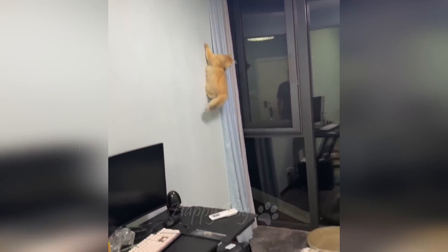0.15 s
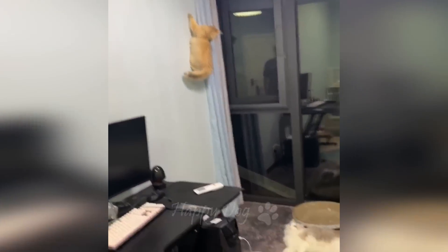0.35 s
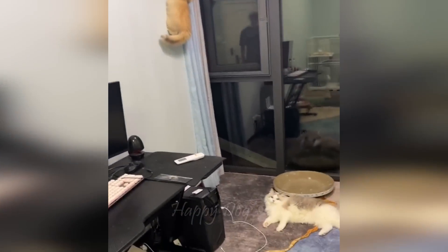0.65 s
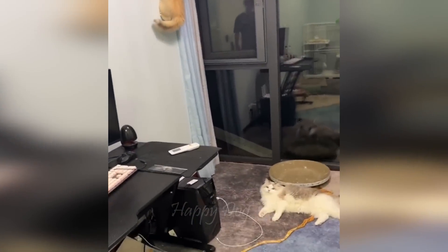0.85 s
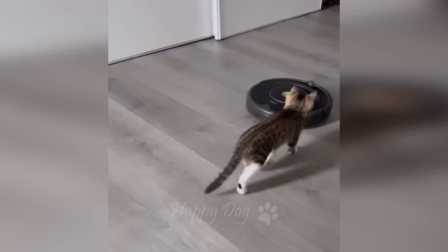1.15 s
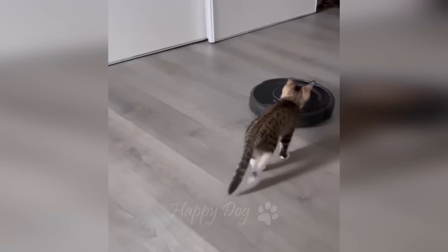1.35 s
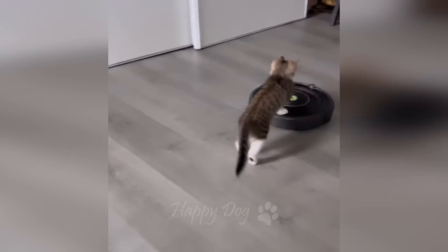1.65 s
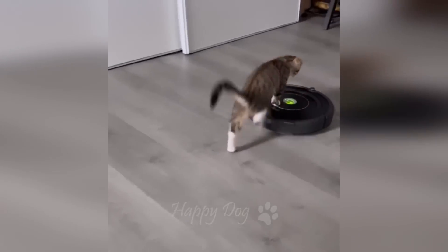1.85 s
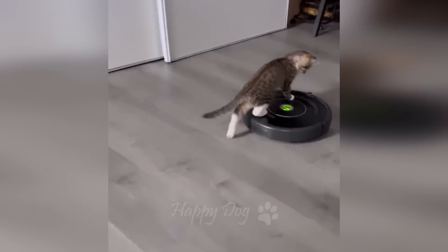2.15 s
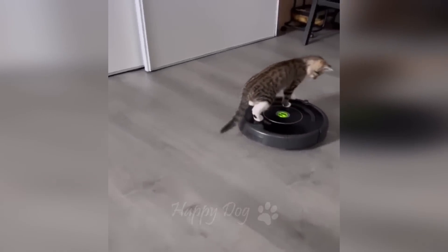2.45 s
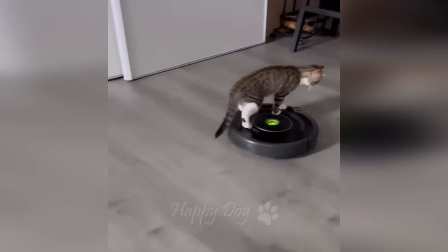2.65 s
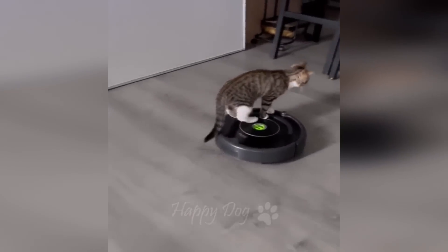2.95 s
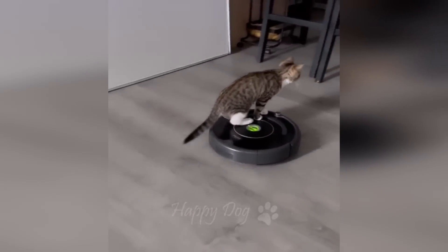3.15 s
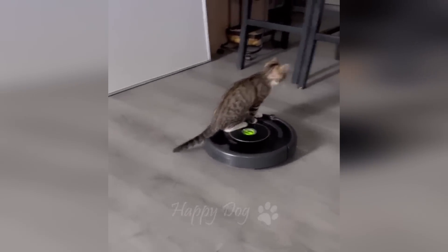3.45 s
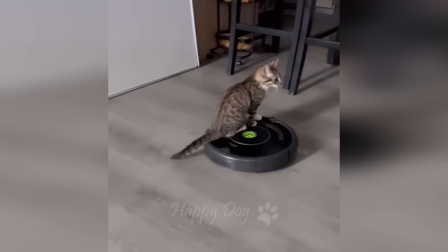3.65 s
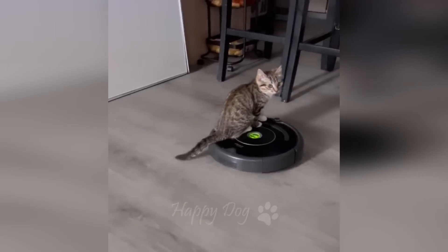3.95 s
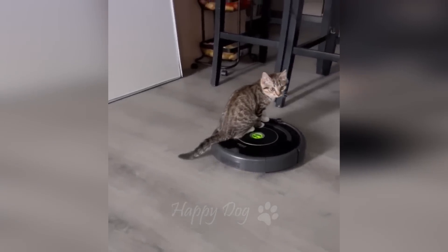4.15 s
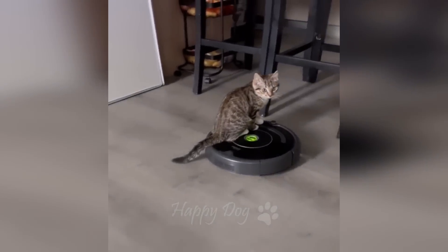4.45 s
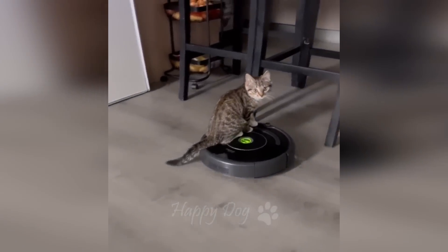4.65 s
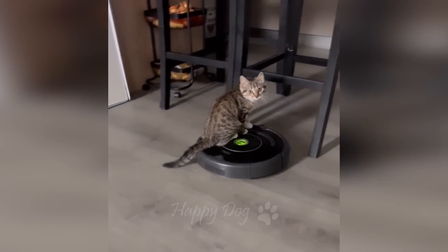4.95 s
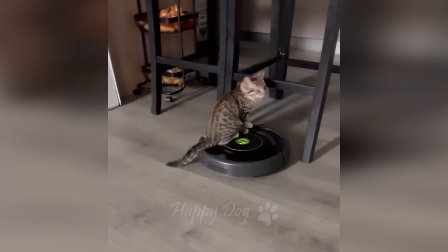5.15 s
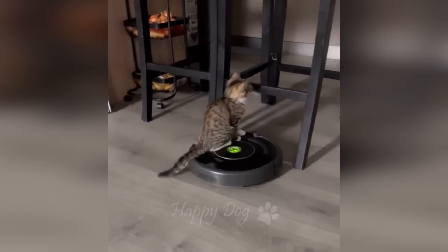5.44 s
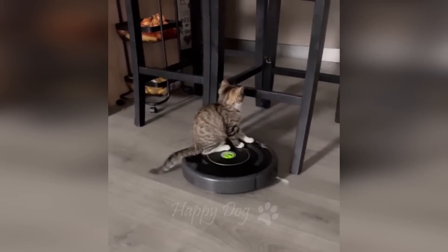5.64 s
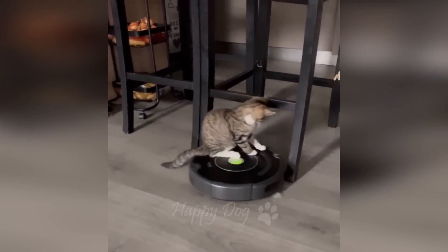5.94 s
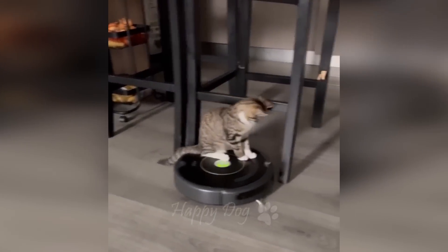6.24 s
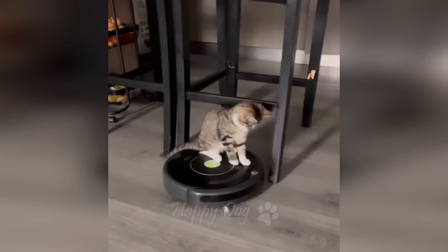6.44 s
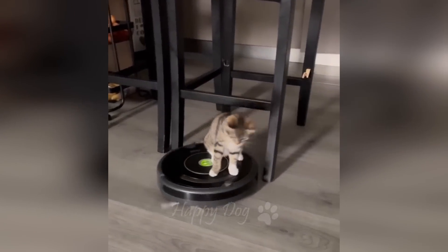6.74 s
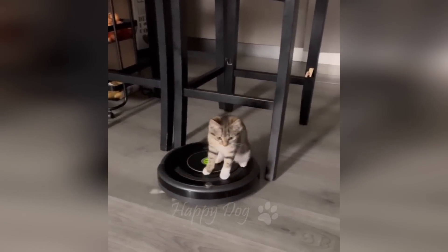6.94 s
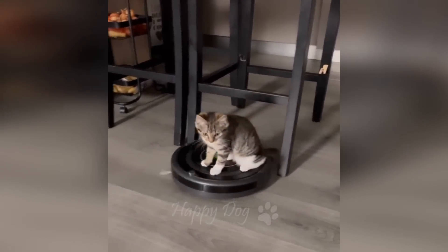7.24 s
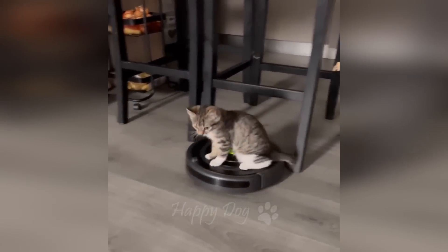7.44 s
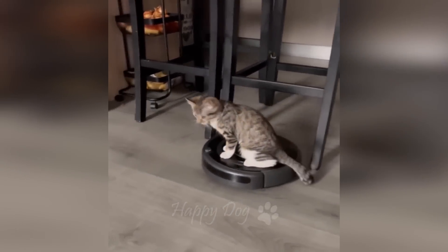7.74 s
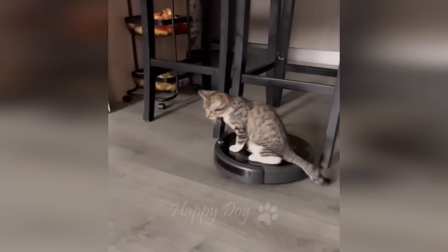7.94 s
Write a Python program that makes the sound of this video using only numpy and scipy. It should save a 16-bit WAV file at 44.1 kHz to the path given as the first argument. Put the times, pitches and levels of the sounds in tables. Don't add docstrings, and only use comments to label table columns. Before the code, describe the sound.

A cat's claws tug softly at cloth, cut to a close robot vacuum hissing and whining on hard floor, with sharp plastic bumper clacks.

```python
import sys
import numpy as np
from scipy import signal
from scipy.fft import rfft, irfft, next_fast_len
from scipy.io import wavfile
from scipy.ndimage import uniform_filter1d, map_coordinates

SR = 44100
rng = np.random.default_rng(int(sys.argv[2]) if len(sys.argv) > 2 else 0)


def ratio_of_db(decibels):
    return 10 ** (np.asarray(decibels, float) / 20)


def store_wav(level_fs):
    pcm = np.round(np.clip(np.atleast_2d(level_fs), -1, 1) * 32767)
    wavfile.write(sys.argv[1], SR, pcm.T.astype(np.int16))


N = 356769

FADE_IN_S = (1.04, 1.527)
# time in seconds, left over right in dB.
PAN = [(1, 1), (3.2, 0.5), (3.8, 0.3), (6.3, 0), (7, .9), (8.1, 1.4)]
# time in seconds, level in dB.
NEARNESS = [(1.55, -0.5), (2.2, -0.5), (2.9, 0.5), (3.6, 0.5), (4.3, -0.5), (5, -1), (5.5, 1.1),
            (5.75, 1.5), (5.96, 4.5), (6.1, 3), (6.25, 1.5), (6.55, 3.5), (6.8, 2), (7.35, 1.5), (7.75, 1),
            (8.09, 2)]
# level in dB, then growth in dB per dB of nearness.
AIR_DB = (-54, -38, -38, -47)
AIR_GROWTH = (1.1, 0.74, 0.9, 0.71)
SCRAPE_DB = (6, 0)
# frequency in Hz, level in dB per Hz.
RUMBLE = [(35, -36), (60, -9.5), (92, -4), (140, -2), (194, -6), (221, -31), (240, 1), (310, -1.5),
          (530, -120)]
HOUSING = [(120, -51), (200, -18.5), (292, -8.5), (339, -3.5), (454, -6.5), (508, -7), (569, -8.5),
           (631, -11), (845, -4.5), (937, -8.5), (1070, -6.5), (1430, -9.5), (1900, -16), (2470, -22.5),
           (4180, -120)]
SUCTION = [(880, -21), (1500, -11.5), (1920, -5.5), (2210, -0.5), (2390, -6), (2970, -3.5), (4590, -8),
           (5010, -11.5), (6000, -18), (7800, -23.5), (13200, -120)]
FIZZ = [(3060, -64), (5200, -0.5), (5710, -2.5), (6870, 1), (7480, -2.5), (8460, 1), (11100, -4.5),
        (12620, -11), (12850, -30), (13100, -46)]
# frequency in Hz, left-right likeness from -1 to 1.
AIR_ALIKE = [(60, 0.69), (130, 0.8), (280, 0.96), (590, 0.92), (1280, 0.92), (2740, 0.88), (5890, 0.74),
             (12600, 0.52)]
# time in seconds, shaft rate in Hz.
SHAFT = [(1, 169.73), (3.8, 169.75), (4.1, 170.0), (4.8, 170.26), (5.5, 170.24), (5.8, 169.9), (6.2, 170.0),
         (7, 169.75), (8.1, 169.45)]
# shaft order, level in dB.
FAN_LOW = [(2, -54.5), (3, -49), (4, -59.5), (5, -56), (6, -64.5)]
# shaft order, level in dB.
FAN_HIGH = [(42, -65), (44, -57), (46, -65), (47, -52.5), (49, -69), (53, -70), (55, -56), (57, -61),
            (59, -50.5), (61, -57), (62, -63), (63, -50), (64, -59), (65, -59), (66, -62), (67, -56),
            (68, -61), (69, -55), (70, -61), (71, -57)]
# centre in seconds, half length in seconds, gain in dB.
FAN_SHADOWS = [
    (5.5, 0.21, -3),
    (6.35, 0.25, -25),
    (7.75, 0.26, 0.5),
]
# centre in seconds, half length in seconds, gain in dB.
FAN_BEAMS = [
    (4.3, 0.42, 5.2),
    (5.15, 0.57, 16.5),
    (6, 0.2, 10),
    (7.3, 0.29, 10),
]
# centre in seconds, half length in seconds, gain in dB.
BLADE_BEAMS = [
    (2.7, .5, 4),
    (4.6, .4, 5),
    (5.75, .2, 10),
    (6.82, .2, 17),
    (7.45, .15, 13),
    (7.9, .25, 15),
]
# centre in seconds, half length in seconds, gain in dB.
CAVITY_OPEN = [
    (1.9, .5, 10),
    (2.6, .3, 8),
    (3.65, .3, 12),
    (4.6, .2, 8),
]
# time in seconds, tooth rate in Hz.
GEARS = [(1.3, 360.4), (2.2, 363), (2.7, 361), (3.3, 359.7), (4, 363), (4.5, 360), (5, 359.7), (5.25, 354),
         (5.45, 350), (5.62, 352), (5.85, 338.5), (5.97, 348), (6.2, 340.5), (6.4, 343.5), (6.57, 358),
         (7, 359), (7.5, 360.5), (8.1, 360)]
# tooth order, level in dB.
MESH = [(2, -7.5), (3, -0.5), (3.04, -10.5), (5, -11), (7, -8)]
# centre in seconds, half length in seconds, whine gain in dB.
WHINE_SURGES = [(1.15, 0.26, 3.5), (1.55, 0.29, 5), (2.25, .1, 1), (2.5, .06, -5), (2.75, 0.068, 5),
                (3.25, .15, 4.5), (3.66, 0.049, -11), (3.8, 0.05, 8), (3.92, 0.036, -10.5), (4.05, .06, 5),
                (4.3, 0.24, 4), (4.7, 0.16, 3.5), (5.15, 0.093, -10), (5.45, 0.078, -6), (5.72, 0.062, -1),
                (5.92, .04, -6), (6.25, 0.041, 4.5), (6.75, 0.17, 8.5), (7, .06, -4), (7.4, 0.16, 7.5),
                (7.65, 0.044, -7), (8, 0.25, 6)]
# centre in seconds, half length in seconds, gain in dB.
LOWER_TURNS = [
    (2.3, 1, -1),
    (3.78, .08, -6),
    (4.3, 0.4, 1.5),
    (5.33, 0.39, -10),
    (6.2, 0.26, -5),
    (7.15, 0.29, 3.5),
    (7.7, 0.27, 5.5),
]
# frequency in Hz, level in dB.
BRUSH = [(35, 0), (70, -10), (140, -9), (150, -5.5)]
# centre in seconds, half length in seconds, gain in dB.
ROLLER_BITES = [
    (1.55, .15, 7),
    (2.15, 0.21, 8),
    (3.1, 0.59, 7.5),
    (4.8, .45, -16),
    (6.15, 0.49, 14),
    (6.98, 0.19, 11),
    (7.52, .1, 8),
    (7.92, 0.16, 15),
]
# frequency in Hz, level in dB per Hz.
HANDLING = [(2, -1.5), (5, -10), (14, -9), (25, -19), (60, -26.5), (120, -64)]
# start in seconds, level in dB, t60 in seconds, crack in dB, crack top in Hz.
BUMPS = [(5.169, -14, 0.011, -21, 4920), (5.174, -21, .012, -10, 4000), (5.194, -21.5, 0.011, 1, 7500),
         (5.1968, -27, .02, 2, 9000), (5.195, -2, 0.022, -28, 5060), (5.1975, -13, 0.055, -5, 4000),
         (5.2, -14, 0.035, -8, 3000), (5.2041, -18, 0.041, -3, 5000), (5.2102, -14, 0.046, -19, 3000),
         (5.218, -21, .06, -21, 3000), (5.986, -25, .03, -4, 5000), (5.991, -28, 0.018, 7, 8000),
         (6.0011, -14, 0.023, -5.5, 12000), (6.0022, -4.5, 0.03, -8.5, 8000),
         (6.0039, -5.5, 0.048, -7, 3980), (6.0054, -10, 0.037, -2, 3460), (6.008, -6.5, 0.038, -7, 3450),
         (6.011, -20, 0.041, 2, 3500), (6.018, -17, 0.04, -10, 2500), (6.026, -20, 0.024, -6, 3000),
         (6.041, -24, .03, -15, 2000), (6.455, -24, .01, -1, 5990)]
# frequency in Hz, level in dB.
SHELL = [(330, -9), (425, -2.5), (680, 4.5), (829, -2), (1000, 3), (1227, 4), (1497, 4), (1900, 6),
         (2116, -4), (2815, -6), (6000, -14)]
# frequency in Hz, level in dB.
FLANK = [(330, 3), (393, -7), (619, 2.5), (791, 6), (980, -4), (1130, -1), (1500, 4.5), (2073, 6),
         (2729, -10), (3400, -4), (6000, -12)]
# start in seconds, peak in dB, frequency in Hz.
THUDS = [(5.389, -30, 248), (5.38, -27, 423), (5.5, -32, 420), (5.521, -29, 180), (5.72, -26, 777),
         (5.839, -29, 353), (5.921, -19.5, 156), (6.0, -21, 150), (6.038, -26.5, 143), (6.08, -26, 640),
         (6.129, -25, 146), (6.154, -21.5, 372), (6.16, -30, 230), (6.223, -24, 347), (6.25, -28, 342),
         (6.45, -39, 131), (6.55, -28, 192), (6.665, -28, 399)]
# frequency in Hz, t60 in seconds.
ROOM = [(200, 0.032), (2000, 0.046), (10000, 0.078)]
# centre in seconds, half length in seconds, frequency in Hz, width in Hz, gain in dB.
FURNITURE = [(1.2, 0.56, 780, 35, 5), (2.5, 1, 263, 14, 6), (4.73, 0.57, 340, 120, -2),
             (4.9, 0.19, 1600, 360, 3), (3.16, 0.22, 6500, 1000, 2), (6, 0.77, 8200, 3630, -0.5),
             (7.8, 0.31, 8400, 250, 3.5), (7.1, 0.44, 7000, 470, -2.5), (7.7, 0.98, 640, 67, 6.5),
             (7.15, 0.3, 900, 61, -6), (8.6, 0.19, 2400, 170, 11), (7.7, 0.34, 9100, 1100, 5),
             (7.64, 0.36, 5630, 250, -1.5), (7.9, 0.45, 3900, 180, 5), (8, 0.15, 11000, 210, -11),
             (7.7, 0.27, 7450, 250, -3), (7.9, 0.25, 6600, 280, 2), (7.85, 0.21, 2800, 140, 8),
             (6.1, 0.24, 1800, 250, 3), (4.9, 0.13, 680, 150, 0.5), (1.3, 0.52, 80, 33, 7),
             (3.85, .3, 75, 33, 8.5), (5.6, 0.14, 160, 65, 0)]

# frequency in Hz, level in dB per Hz.
QUIET_LOW = [(12, -56), (20, -23), (70, 0), (103, -11.5), (150, -7), (190, -13.5), (230, -39), (300, -66),
             (510, -120)]
QUIET_RAIL = [(120, -48), (230, -13.5), (330, -12), (420, -22), (555, -16), (650, -40), (840, -71),
              (1430, -120)]
QUIET_MID = [(350, -35), (600, -5), (829, -6.5), (1100, -6.5), (1330, -11.5), (1820, -13.5), (2640, -19.5),
             (2900, -36), (3770, -56), (6380, -120)]
QUIET_HIGH = [(1650, -34), (2800, -8), (3110, 2), (6280, -15), (7870, -13), (9000, -29), (12500, -41),
              (16200, -63), (22000, -120)]
# frequency in Hz, level in dB per Hz.
HISS = [(2600, -38), (3000, -1), (5000, -2), (8000, -5.5), (13000, -11), (13300, -62)]
# frequency in Hz, left-right likeness from -1 to 1.
QUIET_ALIKE = [(60, -0.56), (170, -0.21), (510, -0.98), (1490, -0.19), (4340, 0.021), (12600, -0.3)]
# start in seconds, strength in dB.
TUGS = [
    (.125, -22),
    (.195, -24),
    (.33, -12),
    (.418, -2.5),
    (0.44, 1),
    (.475, -14),
    (.55, -11),
    (.71, -12),
    (.8, -14),
    (.87, -12),
]
# rest in dB, tugged level in dB, t60 in seconds, rise in seconds.
QUIET_REST_DB = (-46, -54, -60, -91)
TUG_DB = (-44, -33, -39, -49.5)
TUG_T60_S = (0.25, 0.49, 0.46, 0.24)
TUG_RISE_S = (.012, 0.021, 0.0084, 0.0064)
# centre in seconds, level in dB, frequency in Hz, width in Hz, length in seconds.
CLAWS = [
    (.3, -72, 11300, 1300, .016),
    (.36, -73, 3600, 1700, .04),
    (.422, -70, 7000, 3400, .006),
    (.47, -66, 5000, 2600, .04),
    (.445, -63, 5500, 1800, .012),
    (.53, -70, 4300, 1300, .05),
    (.44, -80, 11000, 1100, .03),
    (.86, -67, 4000, 1900, .13),
    (.9, -76, 8500, 4000, .2),
]
# start in seconds, level in dB, frequency in Hz.
RAIL_RINGS = [(.445, -29.5, 184), (.452, -38, 517), (.455, -35, 1006), (.476, -24.5, 340),
              (.497, -33.5, 404), (.5, -35, 315), (.555, -34, 346), (.53, -36, 227), (0.6, -30.5, 170),
              (.67, -37, 230), (0.721, -42, 120), (.76, -38, 290), (.86, -38, 180)]
# frequency in Hz, level in dB.
APPLIANCE = [(990, -69), (1110, -72)]
# time in seconds, gain.
FADE_OUT = [(.5, 1), (.945, .17), (.958, 0)]
# frequency in Hz, mid in dB, side in dB.
SPARED = [(2800, -30, -30), (3500, -7, -5), (5000, -5.5, -3.5), (5600, -3.6, 0), (9000, -2.2, .6),
          (11000, -1.5, .4), (11900, -1, .6), (12200, -3, 1), (12700, -4, 1), (13000, 3, 6)]
# time in seconds, share from 0 to 1.
ISLAND_SHARE = [(1, .5), (4.3, .45), (4.7, .12), (5.5, .15), (5.8, .45), (6.9, .42), (7.2, .2), (8.1, .28)]


def airflow(turning):
    near_db, = curves(NEARNESS)
    rumble_db, housing_db, suction_db, fizz_db = [db + grows * near_db for db, grows in zip(AIR_DB, AIR_GROWTH)]
    swell = wobble(5)
    chop = 1 + 0.026 * np.sin(2 * np.pi * np.cumsum(turning) / SR)
    rumble_db = rumble_db + SCRAPE_DB[0] * load() + 0.65 * wobble(19)
    housing_db = housing_db + SCRAPE_DB[1] * load() + 0.5 * swell
    rumble = ratio_of_db(rumble_db) * rush(RUMBLE, AIR_ALIKE, patchy_db=0.5)
    housing = ratio_of_db(housing_db) * rush(HOUSING, AIR_ALIKE, patchy_db=1.0)
    suction = ratio_of_db(suction_db + 0.5 * swell) * rush(SUCTION, AIR_ALIKE, patchy_db=1.38)
    fizz = ratio_of_db(fizz_db + 0.17 * swell) * rush(FIZZ, AIR_ALIKE, patchy_db=1.0)
    return rumble + chop * (housing + suction + fizz)


def fan(turning):
    low_db = 4.5 + swells(FAN_SHADOWS)
    high_db = -19.5 + swells(FAN_BEAMS)
    low = sum(ratio_of_db(db) * tone(k * turning, flutter_db=1.5, flutter_rate=8, lag=0.059) for k, db in FAN_LOW)
    turning = turning + 0.05 * wobble(12)
    high = sum(ratio_of_db(db) * tone(k * turning, flutter_db=1.5, flutter_rate=6, lag=0.4) for k, db in FAN_HIGH)
    return ratio_of_db(low_db) * low + ratio_of_db(high_db) * high


def drive():
    teeth, = curves(GEARS)
    whine_db = -50 + 5 * load() + swells(WHINE_SURGES)
    lower_db = -47 - 2 * load() + swells(LOWER_TURNS)
    whine_hz = 6 * teeth + 4 * wobble(8) + 10 * wobble(60)
    whine = tone(whine_hz, flutter_db=3, flutter_rate=30, lag=0.2)
    fuzz_hz = 6 * teeth + 25 + 30 * wobble(90)
    whine += ratio_of_db(-5) * tone(fuzz_hz, flutter_db=2.5, flutter_rate=14, lag=0.2)
    steady = 359.8 + 0.25 * (teeth - 360) + 0.8 * wobble(9) + 2 * wobble(40)
    lower = sum(ratio_of_db(db) * tone(k * steady, flutter_db=2.0, flutter_rate=14, lag=0.11) for k, db in MESH)
    return ratio_of_db(whine_db) * whine + ratio_of_db(lower_db) * lower


def load():
    free_hz, stall_hz = 360, 343
    return np.clip((free_hz - curves(GEARS)[0]) / (free_hz - stall_hz), 0, 1)


def knocks():
    second_leg_s = 5.6
    shell, jolts = np.zeros(N + SR), np.zeros(N + SR)
    t = np.arange(SR // 5) / SR
    soft = 1 - np.exp(-t / 0.00008)
    for s, db, t60, crack_db, top_hz in BUMPS:
        ring = np.zeros(len(t))
        for hz, level in (SHELL if s < second_leg_s else FLANK):
            ring_db = level + rng.normal(0, 3.0) - 60 * t / t60 * (hz / 500) ** 0.67
            ring += ratio_of_db(ring_db) * np.sin(2 * np.pi * hz * rng.normal(1, 0.017) * t) * soft
        burst = ratio_of_db(-60 * t / 0.016) * rng.standard_normal(len(t))
        crack = signal.lfilter(*signal.butter(4, min(top_hz, 20000), fs=SR), burst)
        shell[round(s * SR):][:len(t)] += ratio_of_db(db - 16.5) * (ring + ratio_of_db(crack_db + 18.0) * crack)
    for s, db, hz in THUDS:
        push = ratio_of_db(db - 2.0 - 60 * t / 0.066) * (1 - np.exp(-t / 0.002))
        jolts[round(s * SR):][:len(t)] += push * np.sin(2 * np.pi * hz * t)
    small = signal.butter(3, 260, "high", fs=SR)
    return (signal.lfilter(*small, shell) + jolts)[:N]


def brush():
    hum_db = -60.5 + swells(ROLLER_BITES)
    speed = 1 + 0.0404 * wobble(4)
    rough = 1 + 0.06 * np.sin(9 * wobble(20))
    hum = sum(ratio_of_db(db) * tone(hz * speed * rough, flutter_db=4, flutter_rate=9, lag=0.39) for hz, db in BRUSH[1:])
    beat = tone(BRUSH[0][0] * speed, flutter_db=4.0, flutter_rate=5.4, lag=0.44)
    sway = ratio_of_db(-49.5 + 2.0 * wobble(2.88)) * rush(HANDLING, [(10, 0.26)], patchy_db=3.5)
    return ratio_of_db(hum_db) * beat + ratio_of_db(-56) * hum + sway


def cavity():
    whistle = tone(780 + 9 * wobble(30), flutter_db=2.0, flutter_rate=9, lag=0.1)
    blade = tone(12 * curves(SHAFT)[0] + 5 * wobble(40), flutter_db=2.5, flutter_rate=12, lag=0.2)
    return ratio_of_db(-60 + swells(CAVITY_OPEN)) * whistle + ratio_of_db(-64 + swells(BLADE_BEAMS)) * blade


def passing(x):
    hz, t, z = signal.stft(x, SR, nperseg=1024)
    db = sum(d * np.exp(-((hz[:, None] - c) / w) ** 2 - ((t - s) / half) ** 4) for s, half, c, w, d in FURNITURE)
    return signal.istft(z * ratio_of_db(db), SR, nperseg=1024)[1][:, :N]


def room(x):
    hz, t, z = signal.stft(rng.standard_normal((2, SR // 2)), SR, nperseg=256)
    tail = signal.istft(z * ratio_of_db(-60 * t / along(ROOM, hz)[:, None]), SR, nperseg=256)[1]
    tail = tail / np.linalg.norm(tail[0])
    return signal.fftconvolve(np.pad(x, (200, 0))[None], tail, axes=1)[:, :N]


def quiet_room():
    def noise(spectrum):
        return rush(spectrum, QUIET_ALIKE, patchy_db=1.8, size=SR)

    t = np.arange(SR) / SR
    low = tugged(layer=0) * noise(QUIET_LOW)
    rail = tugged(layer=1) * ratio_of_db(1.9 * wobble(61.2)) * noise(QUIET_RAIL)
    mid = tugged(layer=2) * noise(QUIET_MID)
    high = tugged(layer=3, grows=1.7) * noise(QUIET_HIGH) + ratio_of_db(-77.0) * noise(HISS)
    hum = sum(ratio_of_db(db) * tone(hz + 6 * wobble(30), flutter_db=3.5, flutter_rate=13, lag=1.13)
              for hz, db in APPLIANCE)
    for s, db, hz, width, length in CLAWS:
        band = [(max(hz - 2 * width, 1), -60), (hz, 0), (hz + 2 * width, -60)]
        high[:, :SR] += ratio_of_db(db) * np.exp(-((t - s) / length) ** 2) * noise(band)[:, :SR]
    return curves(FADE_OUT)[0] * (low + rail + mid + high + hum + rail_knocks())


def tugged(layer, grows=1):
    t = np.arange(SR) / SR
    power = np.full(N, ratio_of_db(2 * QUIET_REST_DB[layer]))
    for s, db in TUGS:
        after = np.clip(t - s, 0, None)
        decay = ratio_of_db(TUG_DB[layer] + grows * db - 60 * after / TUG_T60_S[layer])
        power[:SR] += (decay * (1 - np.exp(-after / TUG_RISE_S[layer]))) ** 2
    return np.sqrt(power)


def rail_knocks():
    t60, rise = 0.16, 0.0031
    rings = np.zeros(SR)
    for s, db, hz in RAIL_RINGS:
        after = np.clip(np.arange(SR) / SR - s, 0, None)
        rings += ratio_of_db(db - 60 * after / t60) * (1 - np.exp(-after / rise)) * np.sin(2 * np.pi * hz * after)
    return np.pad(rings, (0, N - SR)) * [[-0.2], [1]]


def rush(spectrum, alike, patchy_db, size=N):
    z = signal.stft(rng.standard_normal((2, size)), nperseg=512)[2]
    field = uniform_filter1d(rng.standard_normal(z.shape[1:]), size=6, axis=0)
    field = uniform_filter1d(field, size=12, axis=1)
    pair = signal.istft(z * ratio_of_db(patchy_db * unit(field)), nperseg=512)[1][:, :size]
    m = next_fast_len(size)
    hz = np.fft.rfftfreq(m, 1 / SR)
    turn = np.arccos(np.clip(along(alike, hz), -1, 1)) / 2
    shaped = rfft(pair, m) * ratio_of_db(along(spectrum, hz)) * [np.cos(turn), np.sin(turn)]
    mid, side = irfft(shaped, m)[:, :size]
    return np.pad(unit(np.array([mid + side, mid - side])), ((0, 0), (0, N - size)))


def tone(hz, flutter_db, flutter_rate, lag):
    phase = 2 * np.pi * ((np.cumsum(hz) / SR + rng.random()) % 1)
    flutter = np.exp((flutter_db * np.log(10) / 20 * wobble(flutter_rate)).astype(np.float32))
    return np.sqrt(2) * flutter * np.sin((phase + [[lag], [-lag]]).astype(np.float32))


def swells(rows):
    t = np.arange(0, N / SR + 0.02, 0.01)
    humps = sum(db * np.exp(-((t - s) / half) ** 2) for s, half, db in rows)
    return np.interp(np.arange(N) / SR, t, humps)


def wobble(rate):
    coarse = np.arange(0, N + 64, 64)
    knots = rng.standard_normal(int(N * 200 / SR))
    return np.interp(np.arange(N), coarse, map_coordinates(knots, [coarse * min(rate, 190) / SR]))


def curves(rows):
    s, *cols = np.transpose(rows)
    return [np.interp(np.arange(N) / SR, s, c) for c in cols]


def along(points, hz):
    f, v = np.transpose(points)
    return np.interp(np.log(hz + 1), np.log(f + 1), v)


def unit(x):
    return x / np.sqrt(np.mean(x ** 2) + 1e-20)


def scene():
    turning, = curves(SHAFT)
    hits = knocks()
    robot = passing(airflow(turning)) + fan(turning) + drive() + brush() + cavity()
    robot = robot + hits + ratio_of_db(-8.0) * room(hits)
    fade = np.interp(np.arange(N) / SR, FADE_IN_S, (0, 1))
    return quiet_room() * ratio_of_db([[-1.5], [1.5]]) + fade * robot * ratio_of_db(curves(PAN)[0] * [[0.5], [-0.5]])


def thinned(x):
    def blur(v, bands, frames):
        return uniform_filter1d(uniform_filter1d(v, bands, axis=1), frames, axis=2)

    edge_hz, island_top_hz = 12100, 12620
    hz, t, z = signal.stft(np.array([x[0] + x[1], x[0] - x[1]]) / 2, SR, nperseg=1024)
    starts = np.arange(0, len(hz), 3)
    band_hz = hz[starts, None]
    power = abs(blur(np.add.reduceat(abs(z) ** 2, starts, axis=1), 1, 4)) + 1e-20
    usual = np.exp(blur(np.log(power), 11, 25))
    drift_db = 1.5 * unit(blur(rng.standard_normal(power.shape), 2, 6))
    knots, *margins = np.transpose(SPARED)
    margin_db = [np.interp(hz[starts], knots, m)[:, None] for m in margins]
    need = usual * ratio_of_db(2 * (drift_db + margin_db))
    held = np.repeat(rng.random((len(starts), len(t))), 7, axis=1)[:, :len(t)]
    island = (held < np.interp(t, *np.transpose(ISLAND_SHARE))) & (band_hz < island_top_hz)
    struck = power[0, 75:92].sum(axis=0) > 4 * usual[0, 75:92].sum(axis=0)
    kept = (band_hz < edge_hz) | island | struck | (t < FADE_IN_S[0])
    mask = ((power > need) & kept)[:, np.arange(len(hz)) // 3]
    mid, side = signal.istft(z * mask, SR, nperseg=1024)[1][:, :N]
    return np.array([mid + side, mid - side])


def top_cut(x):
    return signal.sosfilt(signal.butter(12, 13250, fs=SR, output="sos"), x)


def record(dry):
    band = signal.butter(12, 13000, fs=SR, output="sos")
    mix = signal.sosfiltfilt(band, thinned(dry))
    return top_cut(mix)


dry = scene()
out = record(dry)
store_wav(out)
```